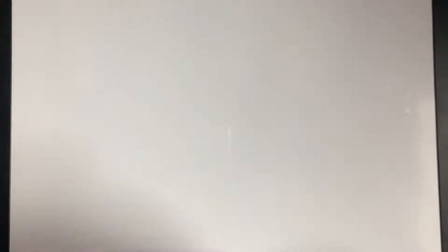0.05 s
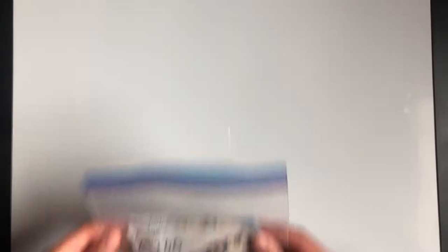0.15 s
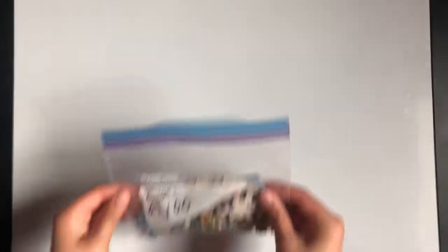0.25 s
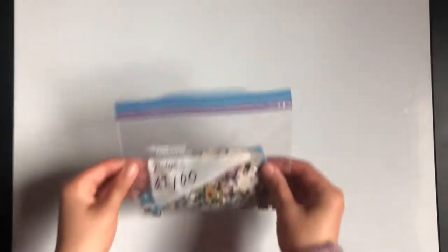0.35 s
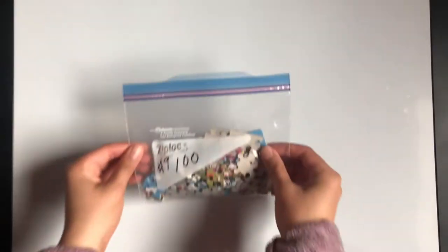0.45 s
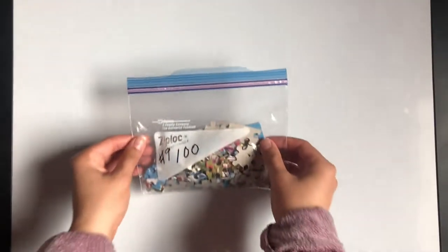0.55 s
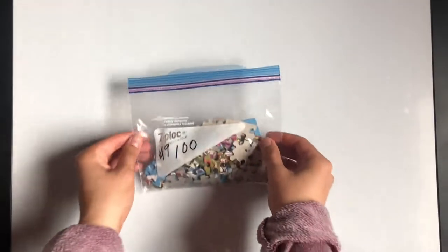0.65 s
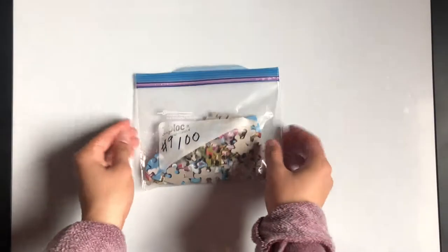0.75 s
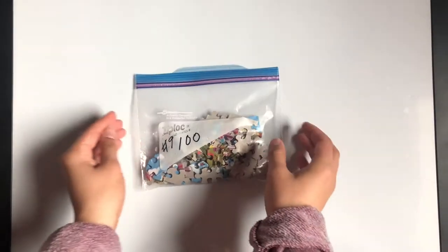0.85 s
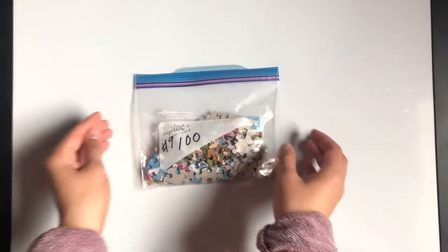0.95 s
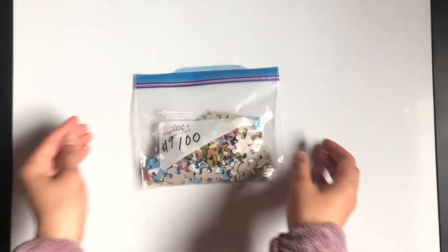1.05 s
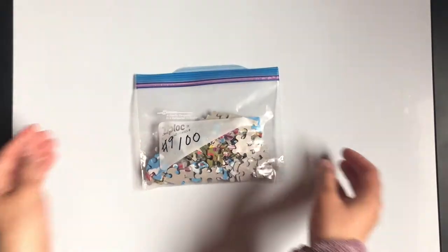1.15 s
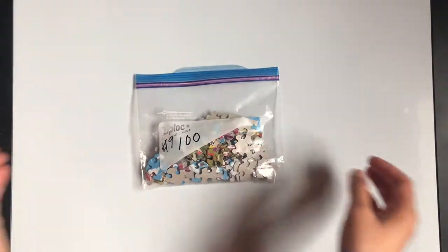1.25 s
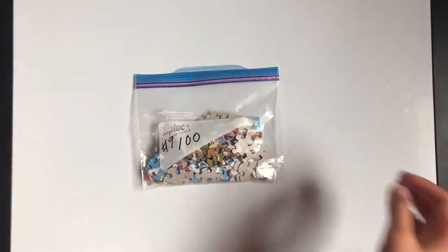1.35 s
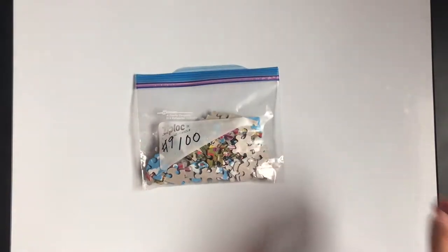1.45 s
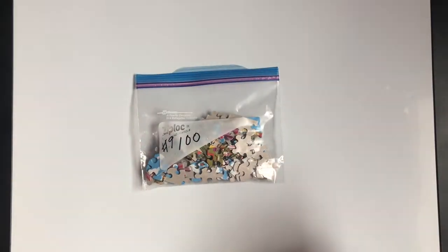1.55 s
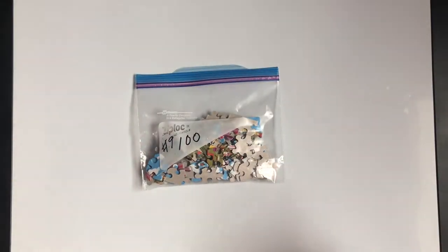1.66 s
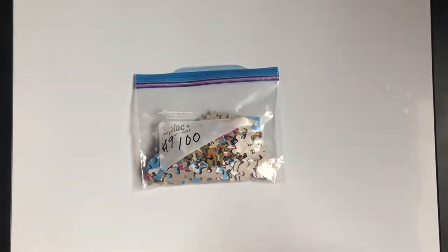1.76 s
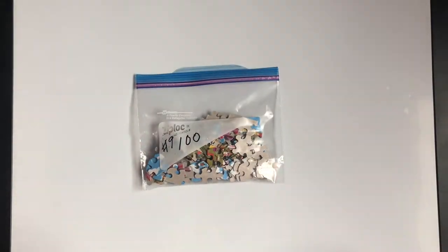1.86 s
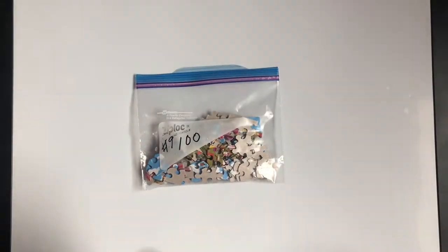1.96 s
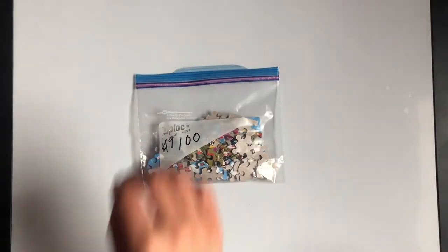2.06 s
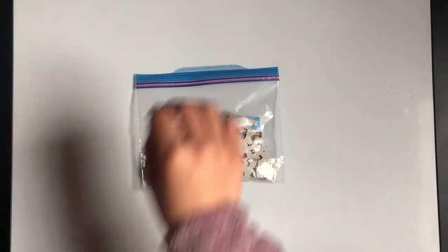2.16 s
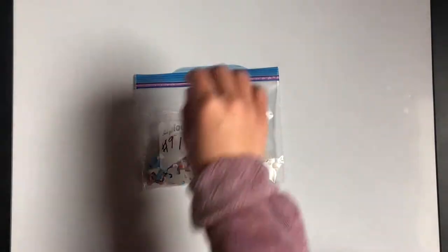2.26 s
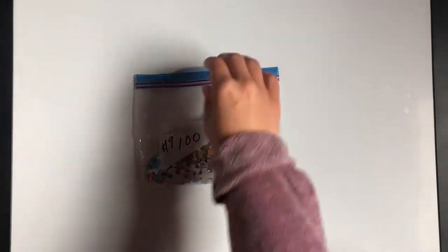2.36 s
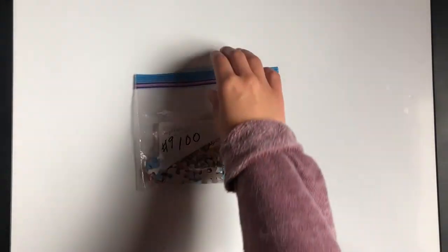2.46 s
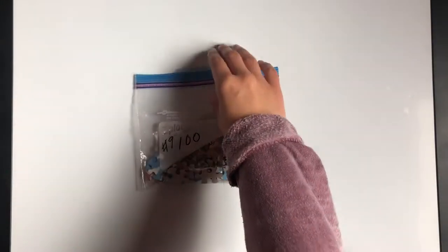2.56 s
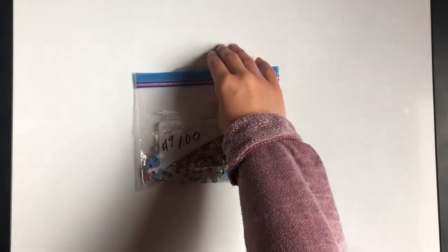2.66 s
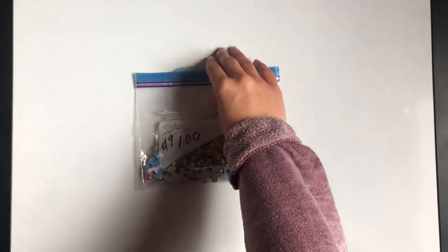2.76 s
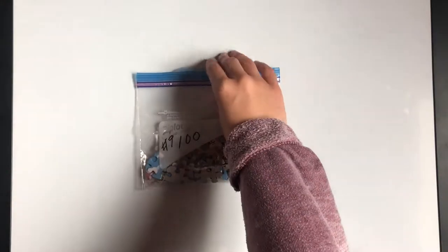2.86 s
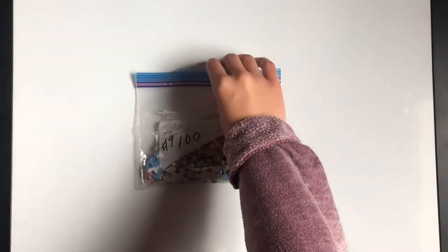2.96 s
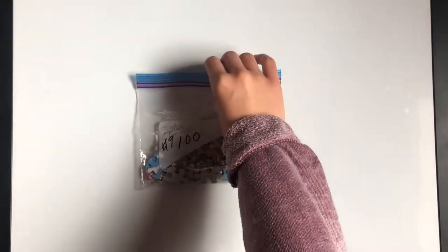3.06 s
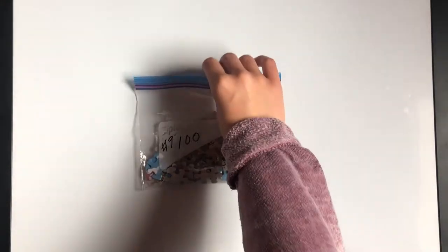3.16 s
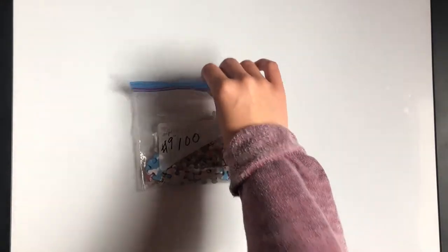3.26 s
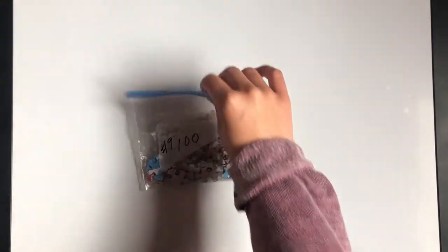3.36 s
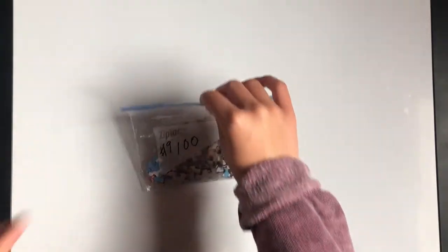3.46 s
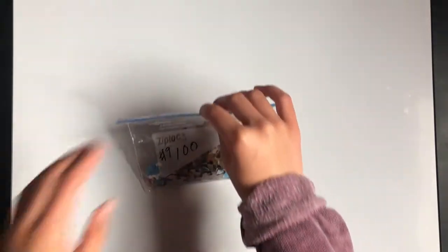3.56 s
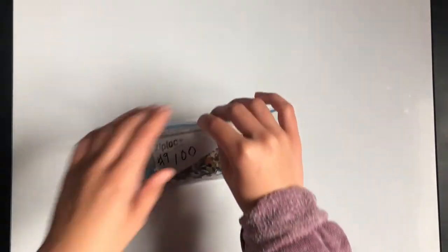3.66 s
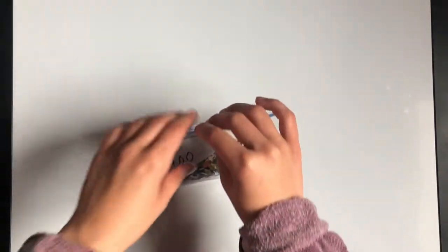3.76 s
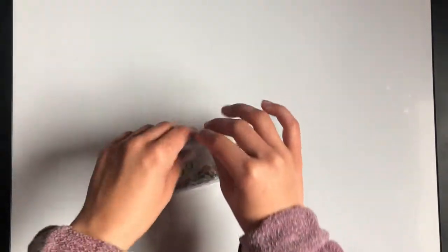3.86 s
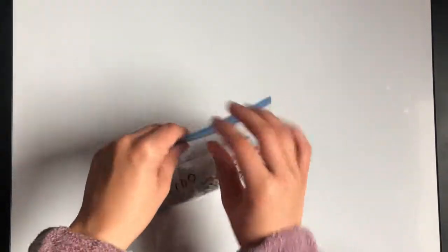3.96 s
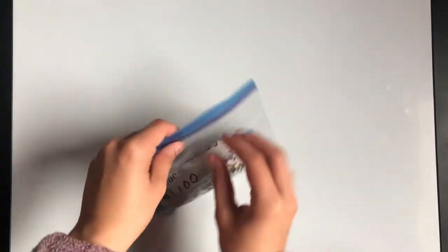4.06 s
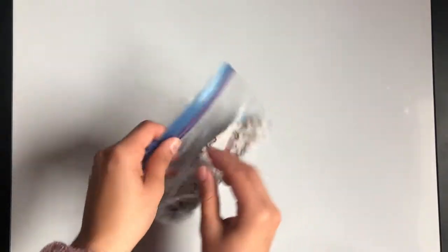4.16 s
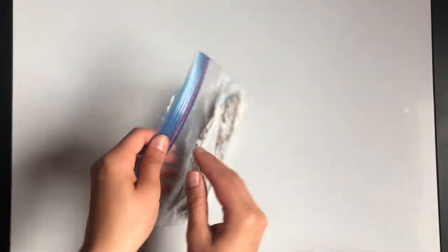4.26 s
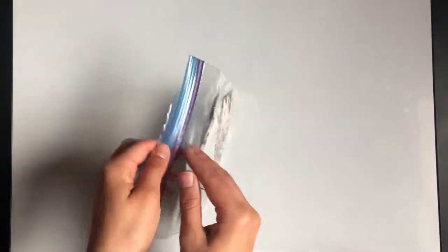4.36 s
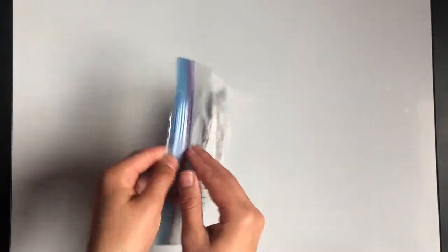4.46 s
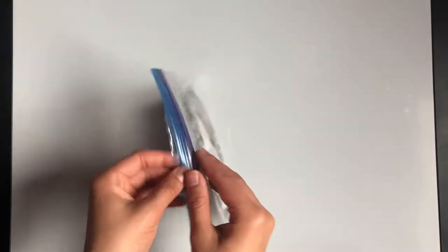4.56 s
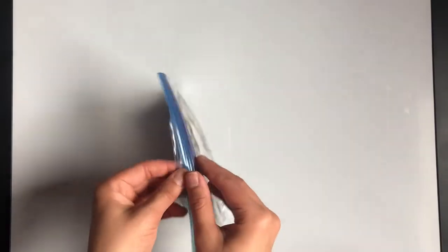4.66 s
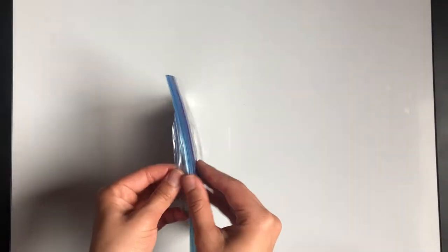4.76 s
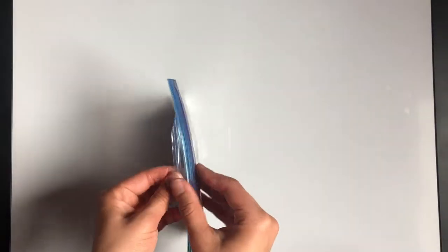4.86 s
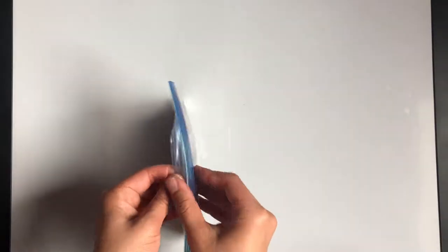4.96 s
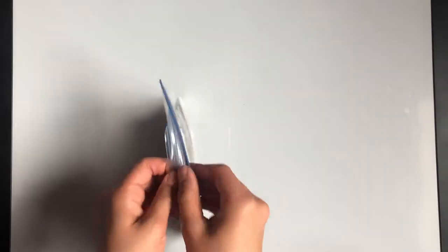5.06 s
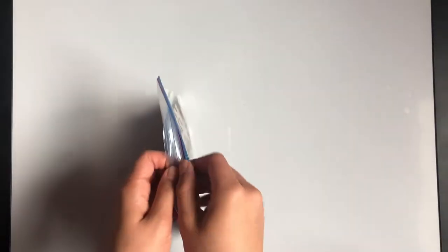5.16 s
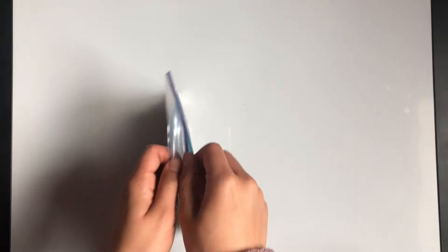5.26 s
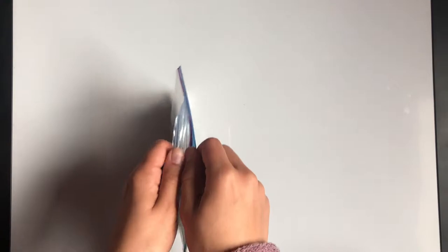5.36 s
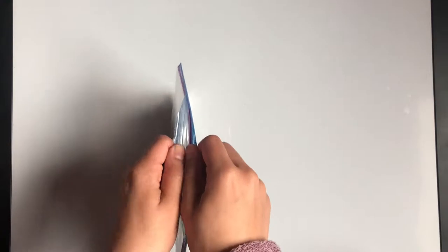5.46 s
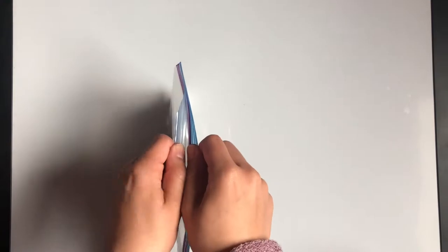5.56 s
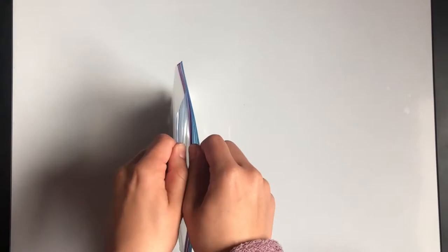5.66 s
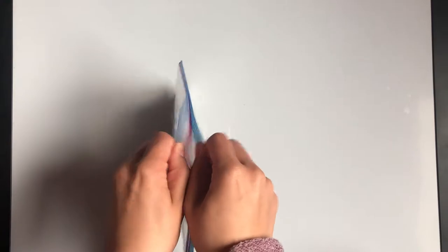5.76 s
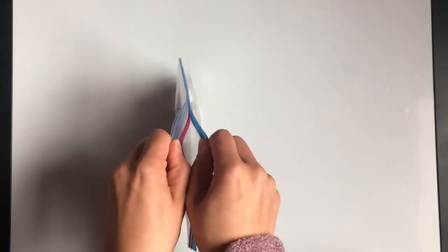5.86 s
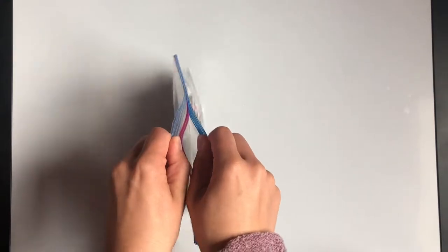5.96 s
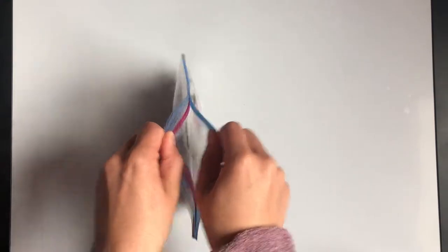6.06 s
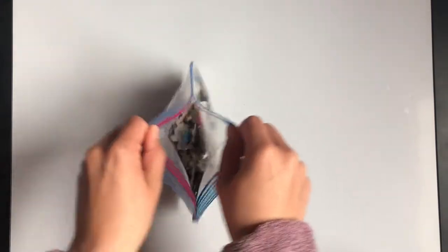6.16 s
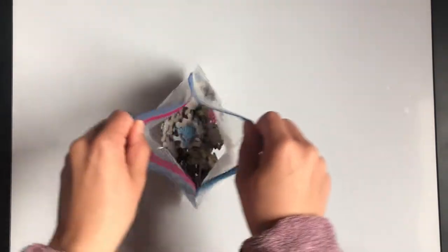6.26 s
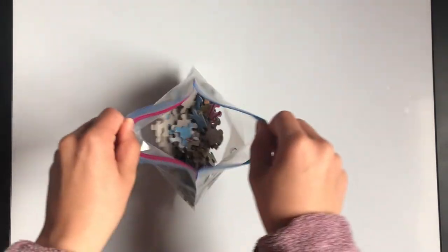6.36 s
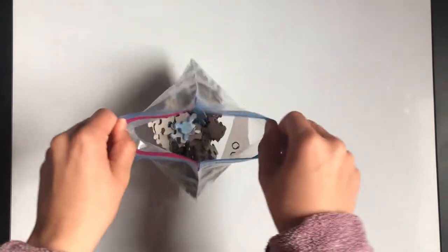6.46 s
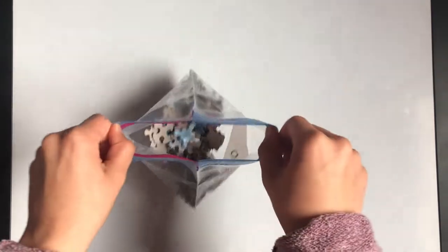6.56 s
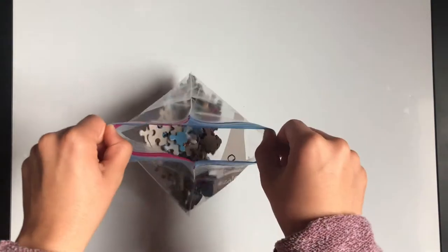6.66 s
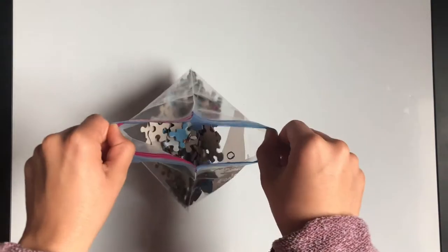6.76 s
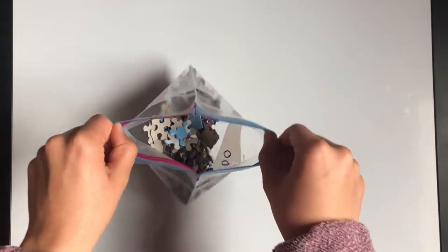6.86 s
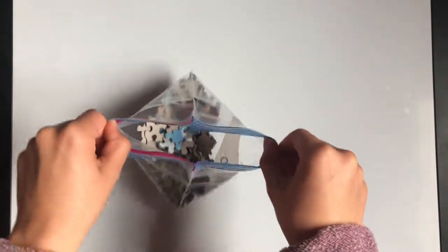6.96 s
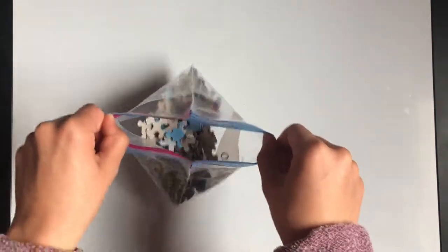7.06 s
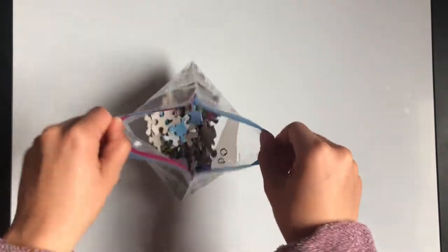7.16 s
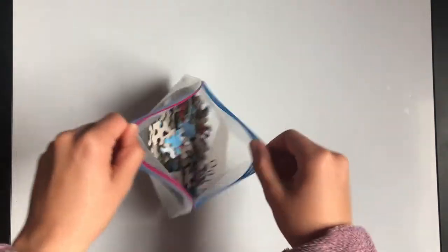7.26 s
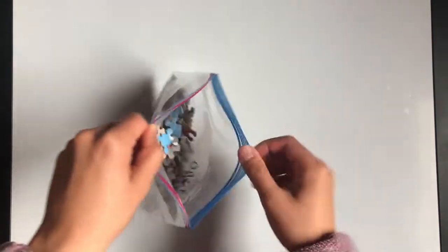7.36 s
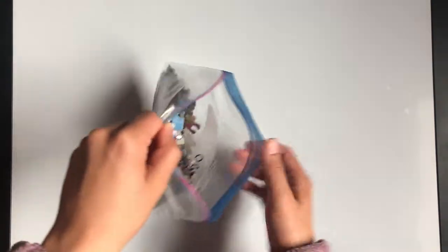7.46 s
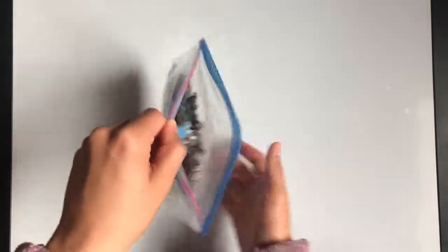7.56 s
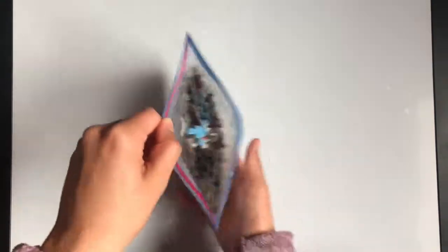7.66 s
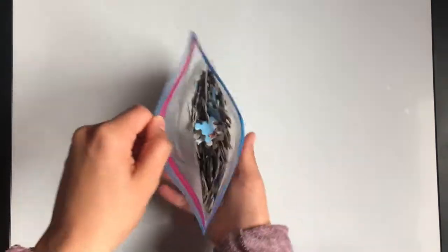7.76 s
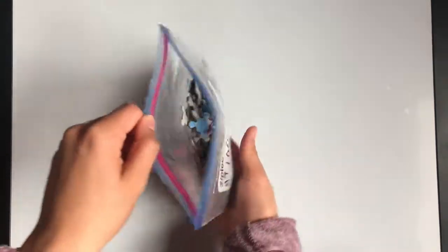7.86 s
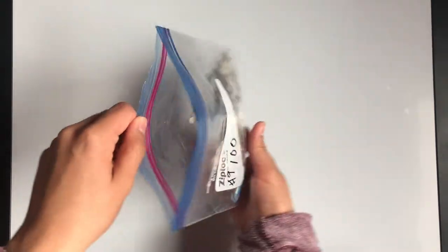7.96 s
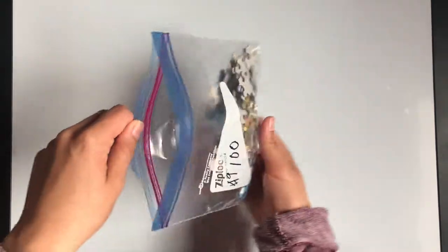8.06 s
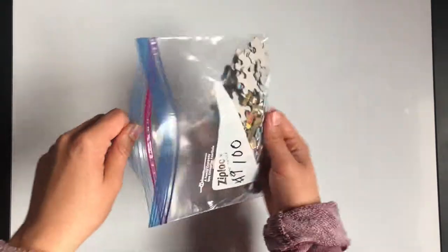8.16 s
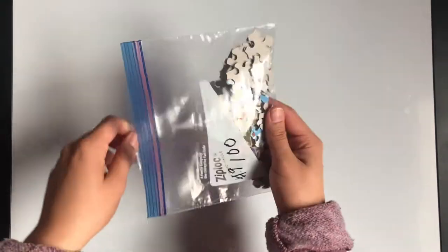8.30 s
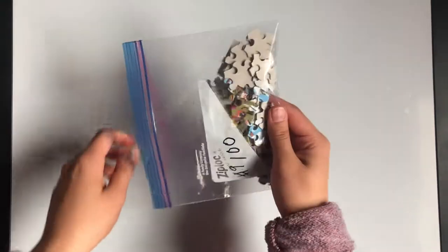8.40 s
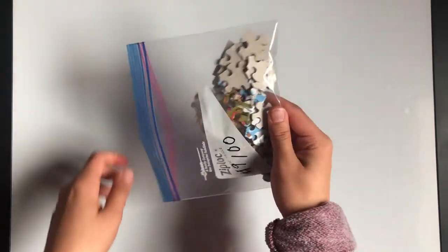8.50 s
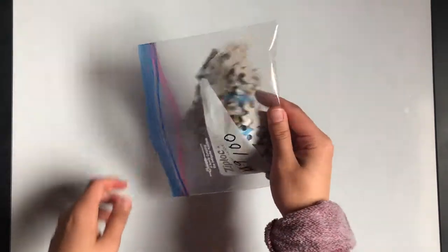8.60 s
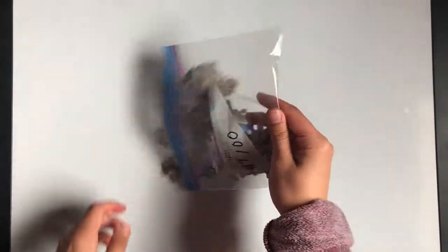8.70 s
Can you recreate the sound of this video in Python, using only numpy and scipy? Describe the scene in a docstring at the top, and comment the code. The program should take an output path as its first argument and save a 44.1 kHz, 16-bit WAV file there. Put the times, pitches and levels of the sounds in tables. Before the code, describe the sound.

Over a faint low hum, a plastic zip bag of cardboard puzzle pieces is set down, crinkled, snapped open sharply, then tipped with dry rattling knocks.

```python
"""A low hum and still air come first, then faint knocks and rustles from a plastic zip bag of puzzle pieces.
The bag is set down on a board, picked up, pulled open and tipped; its seal lets go in a run of sharp snaps.
Seal, creases and knocks are sudden jumps sent through dispersive film into the bag's resonances.
Sliding pieces are taps and scrapes, rubbing fingers are dense tiny slips, thuds are damped sines.
A small room answers briefly with filtered, decaying noise and two echoes."""
import sys
import numpy as np
from scipy import signal
from scipy.fft import rfft, irfft, next_fast_len
from scipy.io import wavfile
from scipy.ndimage import uniform_filter1d

SR = 44100
rng = np.random.default_rng(int(sys.argv[2]) if len(sys.argv) > 2 else 0)


def waveform_to_disk(signal):
    """Save audio, clipped to [-1, 1], as 16-bit WAV at the path in sys.argv[1]."""
    frames = np.transpose(np.atleast_2d(signal))
    scaled = np.clip(frames, -1, 1) * 32767
    samples = np.round(scaled).astype(np.int16)
    wavfile.write(sys.argv[1], SR, samples)


N = 384993  # length in samples
TIME = np.arange(N) / SR  # seconds


def undb(db):
    """Turn decibels into gain."""
    return 10 ** (np.asarray(db) / 20)


def unit(x):
    """Scale to an energy of one."""
    return x / np.sqrt(np.sum(x ** 2))


def steady(x):
    """Scale to an rms of one."""
    return x / np.sqrt(np.mean(x ** 2))


def lookup(hz, rows):
    """Read (Hz, value) rows on a log-frequency axis."""
    row_hz, value = np.transpose(rows)
    return np.interp(np.log(np.maximum(hz, 1)), np.log(row_hz), value)


def band(x, lo, hi, order=2):
    """Keep the sound between lo and hi Hz: a causal Butterworth band-pass of first or second order."""
    size = next_fast_len(len(x))
    f = np.tan(np.pi * np.clip(np.arange(size // 2 + 1) / size, 1e-9, .4999))
    lo, hi = np.tan(np.pi * np.minimum([lo, hi], SR / 2 - 1) / SR)
    s = 1j * (f ** 2 - lo * hi) / (f * (hi - lo))
    divisor = 1 + s if order == 1 else 1 + np.sqrt(2) * s + s ** 2
    return irfft(rfft(x, size) / divisor, size)[:len(x)]


def colour(x, rows):
    """Filter x with the gains of (Hz, dB) rows."""
    size = next_fast_len(len(x))
    hz = np.arange(size // 2 + 1) * SR / size
    return irfft(rfft(x, size) * undb(lookup(hz, rows)), size)[:len(x)]


def fade(t, t60):
    """Exponential decay, 60 dB down after t60 seconds."""
    return np.exp(-np.log(1000) * t / t60)


def walk(rate):
    """Smooth random wander, from rate random values a second."""
    k = int(SR / rate)
    return uniform_filter1d(np.repeat(rng.standard_normal(N // k + 1), k), k)[:N]


def add(out, s, x):
    """Mix x into out from time s."""
    i = int(s * SR)
    out[i:i + len(x)] += x[:N - i]


def grains(rate, spread_db, size=N):
    """Random tiny impacts, rate a second on average, many weak and a few strong."""
    chance, force, side = rng.random((3, size))
    hit, out = chance < rate / SR, np.zeros(size)
    strength_db = spread_db * np.minimum(-np.log(1 - force[hit]), 4)
    out[hit] = undb(strength_db) * np.sign(side[hit] - .5)
    return out


def swells(rows, rise_share, depth_db):
    """Gain over time of movements that each gather to a peak and die away."""
    out, share = np.zeros(N), np.clip(rise_share, .1, .9)
    for s, db, length in rows:
        # 0 at the peak; at 1 the movement is depth_db down
        away = np.maximum((s - TIME) / share, (TIME - s) / (1 - share)) / length
        near = away < 2
        out[near] += undb(db - depth_db * away[near]) ** 2
    return np.sqrt(out)


# Broad resonances of the filled bag, before each snap shifts their pitch.
# Each row: pitch in Hz, width in Hz, level in dB against the other row.
BAG_RESONANCES = [(1022, 364, 0.5), (1507, 680, 1)]
HOLLOW_HZ = 1144  # reference pitch of the bag's hollow, used for the creases


def snaps(rows, flutter, flutter_s, wall_flutter, body_s, body_low_hz, spread_s, ring_db, ring_width,
          crack_top_hz, gain_db):
    """Each snap is a jump of the film and a short flutter; it sounds the bag's air, walls and a taut patch."""
    out, t = np.zeros(N), TIME[:2048]
    khz = np.arange(len(t) // 2 + 1) * SR / len(t) / 1000
    # bending waves in the film are dispersive: 1 kHz takes spread_s to arrive, the treble less
    jump = irfft(np.exp(-4j * np.pi * spread_s * 1000 * np.sqrt(khz)))
    for s, db, ring_hz, hollow_hz, body_db, hollow_db, edge_db in rows:
        noise = rng.standard_normal((2, len(t)))
        detune = hollow_hz / HOLLOW_HZ * np.exp(0.091 * rng.standard_normal(len(BAG_RESONANCES)))
        shiver = unit(noise[0] * fade(t, flutter_s) * (1 - np.exp(-t / spread_s)))
        # the film springs back, notching each snap in its own way
        rebound = np.roll(jump, int(SR * rng.uniform(.0003, .0009)))
        push = jump - .5 * rebound + flutter * shiver
        wall_push = jump + wall_flutter * shiver  # the walls take the jump with their own amount of flutter
        sway = jump + unit(noise[1] * fade(t, body_s))  # the whole bag answers later and longer

        ring_low, ring_high = ring_hz / (1 + ring_width), ring_hz * (1 + ring_width)
        ring = unit(band(band(push, 1500, 9700), ring_low, ring_high, order=1))
        crack = unit(unit(band(push, 2300, crack_top_hz)) + undb(ring_db) * ring)
        body = undb(body_db) * unit(band(sway, body_low_hz, 640))
        walls = 0
        for (hz, width, mode_db), d in zip(BAG_RESONANCES, detune):
            walls = walls + undb(mode_db) * unit(band(wall_push, d * hz - width / 2, d * hz + width / 2))
        hollow = undb(hollow_db) * unit(walls)
        edge = undb(edge_db) * unit(band(push, 8000, 15000))
        add(out, s - spread_s / 2, undb(db + gain_db) * (crack + body - hollow - edge))
    return out


# The seal pops and unzips.
# Each row: time in seconds, level in dB before the shared gain, ring in Hz, then the hollow
# and the sharp edge, both in dB against the level.
SEAL_POPS = [(5.8086, -61.5, 3700, -16, -5), (5.83, -18, 3800, -33, -22), (5.8319, -25.5, 3540, -10, 4.5),
             (5.834, -19.5, 4030, -22, -24), (5.837, -36.5, 5900, 5.5, -12), (5.8512, -25, 6560, -11, -18),
             (5.8533, -22.5, 3120, -11.5, -18), (5.9754, -59, 2350, 2, -22), (6.0026, -50, 2440, -4, -23),
             (6.082, -27, 2700, -7, -21), (6.1082, -19, 6040, -18, -9.5), (6.123, -30.5, 6010, -10, -6),
             (6.149, -21, 5440, -9, -9.5), (6.171, -20.5, 5750, -13.5, -11), (6.1924, -32, 2160, -13, 3.5),
             (6.2155, -26, 5000, -4, -5.5), (6.2466, -32, 5400, -19, 2), (6.262, -27.5, 4330, -8, -9),
             (6.2943, -46, 5000, -5, 0), (6.2998, -36, 3330, -9, 1), (6.3076, -27, 6400, -17, -32),
             (6.3593, -29, 7100, -16, -33), (6.348, -45.5, 2350, -14, -9), (6.3703, -39, 3020, -2.5, -24),
             (6.4155, -27, 7060, -40, -16)]
SEAL_HOLLOW_HZ = 1270  # pulled taut, the bag's hollow sounds higher
# body of the first tick and of the later pops (dB against each snap), time from one to the other (s)
FIRST_BODY_DB, LATER_BODY_DB, BODY_RISE_S = -31, -14, 0.0088


def seal_snaps():
    """The seal gives way in sharp snaps; the faint first tick has little body, every later pop the same share."""
    first = SEAL_POPS[0][0]
    rows = []
    for s, db, hz, hollow_db, edge_db in SEAL_POPS:
        body_db = np.interp(s, [first, first + BODY_RISE_S], [FIRST_BODY_DB, LATER_BODY_DB])
        rows.append((s, db, hz, SEAL_HOLLOW_HZ, body_db, hollow_db, edge_db))
    return snaps(rows, flutter=0.48, flutter_s=0.019, wall_flutter=1.0, body_s=0.032, body_low_hz=260,
                 spread_s=0.001092, ring_db=2, ring_width=0.091, crack_top_hz=6670, gain_db=18)


def shudder(start_s=5.8301, db=-33, t60=0.1, low_hz=1400, high_hz=5500):
    """From the first loud pop the freed lips of the seal shiver in a fast, fading crackle."""
    out, t = np.zeros(N), TIME[:SR // 3]
    crackle = steady(band(grains(2800, 2.5, size=len(t)), low_hz, high_hz, order=1))
    add(out, start_s, undb(db) * crackle * fade(t, t60) * (1 - np.exp(-t / 0.0066)))
    return out


# the bag's body sounds at this level plus a share of the crease's dB, before the shared gain
CREASE_BODY_DB, BODY_FOLLOWS = -38, 0.53


def crease(s, db, hz, hollow_db, edge_db):
    """One buckling crease, with a body level set from its own level."""
    body_db = CREASE_BODY_DB + BODY_FOLLOWS * db - db
    return s, db, hz, HOLLOW_HZ, body_db, hollow_db, edge_db


# The bag is turned in the hands and its film keeps crinkling faintly.
# Each row: start in seconds, end in seconds.
HELD_SPANS = [(3.85, 4.95), (6.1, 8.72)]


def crinkles(count=60, level_db=-71, spread_db=1.5, ring_hz=4500, spread_octaves=.5, hollow_db=-3, edge_db=-12):
    """Faint creases that give way at random while the bag is held."""
    held = np.concatenate([TIME[(TIME > start) & (TIME < end)] for start, end in HELD_SPANS])
    times = rng.choice(held, count)
    chance = np.clip(rng.standard_normal((count, 2)), -2, 2)
    return [crease(s, level_db + spread_db * force, ring_hz * 2 ** (spread_octaves * taut), hollow_db, edge_db)
            for s, (force, taut) in zip(times, chance)]


# Creases in the film buckle.
# Each row: time in seconds, level in dB before the shared gain, ring in Hz, then the hollow
# and the sharp edge, both in dB against the level.
CREASE_SNAPS = [(.2429, -50, 3000, -3, -17), (0.2651, -59.5, 6400, 4.5, -22), (.5855, -45, 6100, -3.5, -19),
                (.7839, -50, 5270, -5, -21), (0.8022, -52, 3470, -3, -20), (0.8102, -52, 3300, -11, -21),
                (.8422, -47, 2220, -18, -20), (0.8491, -38, 2110, -33, -6), (.8598, -53, 2700, -14, -12),
                (.8839, -54, 1880, -16, -23), (0.943, -66, 5250, -14, -17), (1.269, -69, 5400, 4, -10),
                (2.7273, -47.5, 2700, -35, -47), (2.9525, -65.5, 5470, -1, -9),
                (3.3278, -49, 3600, -19, -30), (3.365, -46.5, 5260, -8.5, -17),
                (3.3787, -52.5, 2190, -12, -24), (3.389, -58, 2220, -2, -15),
                (3.4342, -42.5, 4900, -9, -25), (3.4815, -49.5, 2150, -13, -17),
                (3.4938, -52, 2930, -18, -35), (3.9136, -45.5, 4900, -9, -2.5),
                (4.0491, -51.5, 6400, -6, -12), (4.2002, -59.5, 2550, -1, -20),
                (4.2831, -60, 2950, -4, -23), (4.3326, -54.5, 6200, -5.5, -28),
                (4.4727, -52.5, 4300, -8, -29), (4.6677, -66, 3190, 0, -16),
                (4.6929, -62.5, 7160, -13, -13), (4.8442, -57, 6760, -22, 2),
                (4.8487, -54.5, 5840, -13, -7), (4.987, -62, 3510, -6, -24), (5.0796, -62, 2860, 0, -25),
                (5.0855, -62.5, 2260, 2.5, -31), (5.158, -57, 6270, -3.5, -26),
                (5.1626, -57, 3600, -17, -35), (5.259, -56.5, 6160, -4.5, -31),
                (5.2637, -53.5, 2440, -12, -29), (5.4396, -58.5, 2220, -25, -18),
                (5.5078, -60, 4970, -10, -33), (6.4683, -46.5, 3550, 4, -17),
                (6.6747, -43.5, 2820, -9, -36), (6.735, -42, 3100, -27.5, -18),
                (7.2767, -61.5, 4570, 2.5, -25.5), (7.541, -50, 3730, -2.5, -28),
                (7.5631, -44, 3860, 3.5, -17), (7.57, -43, 5250, -7, -12), (7.748, -38, 4300, -17, -26),
                (7.7606, -43.5, 6500, -13, -17), (7.9032, -45, 7230, -18, -23),
                (7.9121, -51.5, 4950, -0.5, -13), (7.9475, -45, 3770, 1, -30), (7.9734, -39, 4120, 0, -37),
                (8.158, -58, 5000, -10, -27), (8.4147, -59, 5070, -0.5, -16), (8.614, -42, 3660, -10, -22),
                (8.63, -47, 3100, 5, -23)]


def creases():
    """Buckling creases and faint crinkles are snaps of the loose film."""
    rows = [crease(*row) for row in CREASE_SNAPS] + crinkles()
    return snaps(rows, flutter=0.72, flutter_s=0.017, wall_flutter=0.83, body_s=0.024, body_low_hz=205.8,
                 spread_s=0.001028, ring_db=0.0, ring_width=0.095, crack_top_hz=6400, gain_db=20)


# Clumps of pieces knock against the wall of the bag.
# Each row: time in seconds, level in dB before the shared gain, pitch of the hollow in Hz.
CLUMP_KNOCKS = [(0.1295, -58.5, 1100), (.29, -56, 900), (0.3334, -59.5, 826), (0.635, -61.5, 1090),
                (.6561, -60, 750), (3.5541, -63, 800), (4.0805, -56.5, 900), (4.2607, -59, 895),
                (6.4312, -41, 1000), (6.461, -43.5, 1200), (6.4955, -50.5, 1080), (6.5497, -55.5, 1110),
                (6.6134, -54, 1050), (6.718, -49, 1220), (6.7541, -59, 1000), (6.9213, -56.5, 1030),
                (6.984, -59.5, 910), (7.0685, -59, 950), (7.1025, -59, 1090), (7.1731, -54.5, 1083),
                (7.5892, -47, 1320), (7.7779, -50, 1600), (7.7933, -43.5, 1450), (7.822, -46.5, 1350),
                (7.924, -50, 1640), (8.0194, -34.5, 1200), (8.118, -45, 950), (8.1323, -43, 1110),
                (8.2057, -49.5, 836), (8.2331, -49.5, 1560), (8.2564, -44.5, 1390), (8.2668, -49, 1110),
                (8.636, -46, 1500), (8.652, -50, 930), (8.6777, -43, 1110), (8.6894, -43.5, 1320),
                (8.726, -47, 1920)]
CRACK_DB, BODY_DB, EDGE_DB = -13.5, -17, -42  # against the knock's level


def knocks(ring_hz=3260):
    """A clump of pieces sounds mostly the hollow of the bag, with a slight crack of the film."""
    # snaps() counts the other parts from the crack
    rows = [(s, db + CRACK_DB, ring_hz, hz, BODY_DB - CRACK_DB, -CRACK_DB, EDGE_DB - CRACK_DB)
            for s, db, hz in CLUMP_KNOCKS]
    return snaps(rows, flutter=0.5, flutter_s=0.015, wall_flutter=0.59, body_s=.03, body_low_hz=190,
                 spread_s=0.001005, ring_db=0, ring_width=0.2, crack_top_hz=6400, gain_db=19.5)


# Tone of scraping card. Each row: frequency in Hz, gain in dB.
SCRAPE_COLOUR = [(120, -19.5), (220, 2), (550, -1), (1000, 0.5), (1600, -10), (2400, -2.5), (4500, -7.5),
                 (8000, -15.5), (16000, -34.5)]
# The heap of pieces slides as the bag is moved.
# Each row: peak in seconds, level in dB before the gain, length in seconds.
HEAP_SLIDES = [(.24, -73, 0.32), (.85, -58, 0.23), (3.4, -66, 0.093), (4.04, -66, 0.28), (4.27, -64, 0.054),
               (4.34, -58, 0.032), (4.53, -66, 0.16), (5.3, -73.5, 0.72), (5.88, -64, 0.14),
               (6.35, -55.5, .33), (6.47, -46, 0.047), (6.73, -60.5, 0.32), (7.09, -65.5, 0.21),
               (7.2, -67, 0.16), (7.36, -71.5, 0.33), (7.6, -50.5, 0.1), (7.79, -50.5, 0.11),
               (7.95, -64, .18), (8.12, -64.5, 0.12), (8.2, -63.5, .14), (8.44, -60.5, 0.22),
               (8.63, -54.5, 0.13), (8.72, -52.5, 0.23)]
SLIDE_RISE_SHARE, SLIDE_DEPTH_DB = 0.65, 20.5  # gathers over this share of its length, from this far down


def pieces(rate=190, spread_db=4.5, scrape=1.0, low_hz=780, high_hz=2100, gain_db=1):
    """Cardboard pieces tap each other, each with its own dead ring, and scrape in between."""
    taps, t = np.zeros(N), TIME[:1024]
    draws = rng.random((4000, 3))
    for when, pitch, force in draws[:int(rate * N / SR)]:
        hz = low_hz * (high_hz / low_hz) ** pitch
        size = undb(spread_db * min(-np.log(1 - force), 3.5))
        t60 = 10 / hz  # card is so damped that a tap dies within ten cycles
        add(taps, when * N / SR, size * unit(np.sin(2 * np.pi * hz * t) * fade(t, t60)))
    tapping = steady(band(taps, 500, 5600))
    scraping = steady(colour(grains(1200, 3), SCRAPE_COLOUR))
    movement = swells(HEAP_SLIDES, SLIDE_RISE_SHARE, SLIDE_DEPTH_DB)
    return steady(tapping + scrape * scraping) * movement * undb(gain_db)


# Tone of rubbed plastic. Each row: frequency in Hz, gain in dB.
SLIP_COLOUR = [(100, -22), (300, -11), (1200, -6.5), (3000, -9), (6000, -4), (9000, -8), (13000, -10),
               (16000, -18)]
# Fingers and film rub in strokes.
# Each row: peak in seconds, level in dB before the unevenness, length in seconds.
RUB_STROKES = [(.24, -76.5, 0.32), (.82, -64, 0.13), (3.99, -75, 0.14), (4.14, -72, .14),
               (4.24, -66.5, 0.11), (4.37, -67, 0.15), (4.6, -69, 0.27), (4.83, -68, 0.17),
               (5.34, -71, 0.19), (5.861, -44.5, 0.023), (6.13, -57, .05), (6.22, -63, .11),
               (6.32, -59, 0.085), (6.43, -64, 0.2), (6.72, -73.5, .2), (6.84, -79, 0.16), (7.2, -75, 0.73),
               (7.6, -55.5, 0.053), (7.79, -64.5, .07), (7.95, -65, 0.11), (8.11, -72, 0.3),
               (8.42, -74.5, .3), (8.72, -62, 0.19)]
STROKE_RISE_SHARE, STROKE_DEPTH_DB = 0.53, 10.5  # gathers over this share of its length, from this far down


def rubbing(rate=3000, spread_db=1.0, uneven_db=4.5):
    """Skin and film slide in a dense run of tiny slips."""
    slips = steady(colour(grains(rate, spread_db), SLIP_COLOUR))
    movement = swells(RUB_STROKES, STROKE_RISE_SHARE, STROKE_DEPTH_DB)
    return slips * movement * undb(uneven_db * walk(60))


# Soft thuds of the bag on the board and of its walls springing apart.
# Each row: start in seconds, level in dB before the onset and decay, pitch in Hz, decay by 60 dB in seconds.
THUDS = [(0.81, -35.5, 236, 0.042), (.825, -31, 272, 0.017), (0.851, -28.5, 330, 0.021),
         (.866, -52, 260, 0.08), (2.882, -40, 58.7, .096), (2.988, -46, 260, .035),
         (5.8518, -27, 470, 0.024), (6.149, -25.5, 343, 0.025)]


def bumps():
    """The soft bag lands, is gripped and springs open with a few damped thuds."""
    out, t = np.zeros(N), TIME[:8192]
    for s, db, hz, t60 in THUDS:
        contact = 1 - np.exp(-t * hz * 4)
        add(out, s, undb(db) * contact * np.sin(2 * np.pi * hz * t) * fade(t, t60))
    return out


# Soft brushes of sleeve, hand and bag.
# Each row: middle in seconds, length in seconds, rms level in dB before the swell and unevenness,
# centre in Hz, width in octaves.
SOFT_BRUSHES = [(0.461, 0.19, -77.5, 4440, 2), (0.834, .19, -60, 213, 1), (1.374, 0.1, -70.5, 1960, 1.55),
                (2.223, 0.074, -74.5, 1020, 1.1), (2.7, .1, -77.5, 3000, 1.5),
                (2.971, 0.32, -69, 220, 1.54), (3.36, 0.51, -71, 3700, 2.2), (3.387, 0.079, -69, 260, 0.58),
                (3.732, 0.39, -80, 3360, 2), (3.961, 0.25, -72.5, 4800, 1.3),
                (4.181, .26, -72.5, 5400, 0.77), (7.413, 0.22, -70, 10900, 1.2),
                (8.282, .4, -73.5, 4500, 1.3)]


def brushes(uneven_db=4.0):
    """Cloth and film glide past each other: bands of noise in smooth, slightly uneven swells."""
    out, unevenness = np.zeros(N), undb(uneven_db * walk(70))
    for s, length, db, hz, octaves in SOFT_BRUSHES:
        swell, half = np.hanning(int(length * SR)), 2 ** (octaves / 2)
        hiss = steady(band(rng.standard_normal(len(swell)), hz / half, hz * half))
        add(out, s - length / 2, undb(db) * swell * hiss)
    return out * unevenness


# Tone of the room's answer. Each row: frequency in Hz, gain in dB.
ROOM_TONE = [(100, 0), (400, 2), (900, 4.5), (2000, 3.5), (3500, 6), (7000, -5), (16000, -0.5)]
# Decay of the room's tail. Each row: frequency in Hz, time to fall by 60 dB in seconds.
ROOM_DECAY = [(200, 0.62), (600, 0.14), (1500, 0.31), (3700, 0.23), (10000, 0.22)]
# Single echoes from the ceiling and a wall. Each row: delay in seconds, level in dB before dulling.
SINGLE_ECHOES = [(0.0151, -18), (0.0209, -23)]


def room(x, early_db=-19, early_t60=.12, late_db=-19, gap_s=0.0084, echo_top_hz=7000):
    """A quick wash and a tail swell up at once; two dull echoes, from ceiling and wall, stand out in them."""
    t = TIME[:SR // 2]
    build = 1 - np.exp(-(t / gap_s) ** 2)
    early = colour(rng.standard_normal(len(t)), ROOM_TONE) * fade(t, early_t60)
    late = 0
    for hz in 125 * 2 ** np.arange(8):
        octave = band(rng.standard_normal(len(t)), hz / np.sqrt(2), hz * np.sqrt(2))
        late = late + octave * undb(lookup(hz, ROOM_TONE)) * fade(t, lookup(hz, ROOM_DECAY))
    response = undb(early_db) * unit(early * build) + undb(late_db) * unit(late * build)
    for delay, db in SINGLE_ECHOES:
        scatter = unit(rng.standard_normal(128) * fade(t[:128], 0.0039))
        add(response, delay, undb(db) * band(scatter, 150, echo_top_hz, order=1))
    return signal.fftconvolve(x, response)[:N]


# Tone of the still air. Each row: frequency in Hz, gain in dB.
AIR_TONE = [(15, -43), (25, -22.5), (53, -5.5), (82, -11), (117, -10), (180, -17), (270, -23.5), (326, -23),
            (416, -24.5), (531, -28.5), (840, -30.5), (936, -30.5), (1130, -35.5), (7310, -44),
            (16000, -54)]
# Low hum. Each row: pitch in Hz, rms level in dB before it wavers.
HUM_TONES = [(53.8, -77), (119.3, -68.5)]


def background(air_db=-66.5, waver=0.18, drift=0.78):
    """Still room air is coloured noise; the low hum is sines that waver in level and phase."""
    air = steady(colour(rng.standard_normal(N), AIR_TONE)) * undb(air_db)
    hum = 0
    for hz, db in HUM_TONES:
        level = undb(db) * np.sqrt(2) * (1 + waver * walk(36))
        hum = hum + level * np.sin(2 * np.pi * hz * TIME + drift * walk(11))
    return air + hum


def scene(wet_db=-2, knock_wet_db=-5):
    """The seal, held high, stirs the room most, the pieces deep in the bag least."""
    seal = seal_snaps() + shudder()
    clumps = knocks()
    handling = creases() + bumps() + pieces() + rubbing() + brushes()
    answer = room(seal + undb(wet_db) * handling + undb(knock_wet_db) * clumps)
    return (seal + handling + clumps + answer + background())[None]


def record(dry):
    """The sound opens after a moment of silence, without the deepest bass and the highest treble."""
    opening = np.clip((TIME - .037) / .005, 0, 1)
    highpass = signal.butter(4, 36, "high", fs=SR, output="sos")
    lowpass = signal.ellip(8, .2, 70, 16100, fs=SR, output="sos")
    return signal.sosfilt(lowpass, signal.sosfilt(highpass, dry) * opening)


dry = scene()
out = record(dry)
waveform_to_disk(out)
```